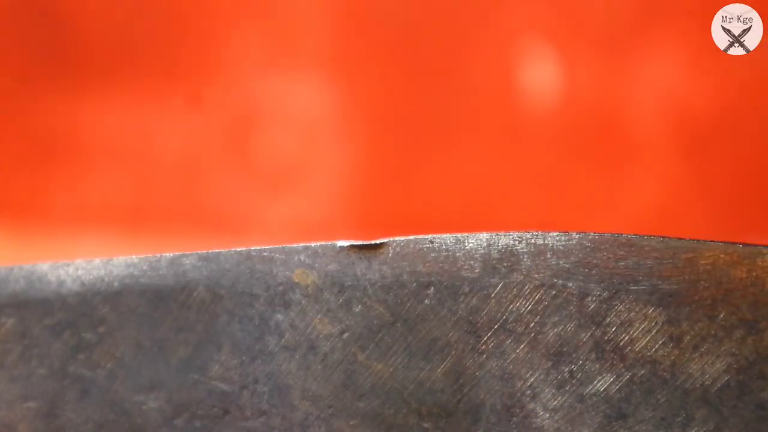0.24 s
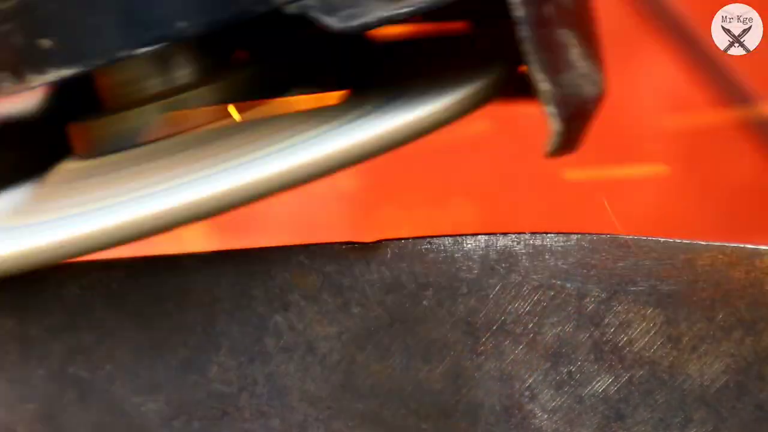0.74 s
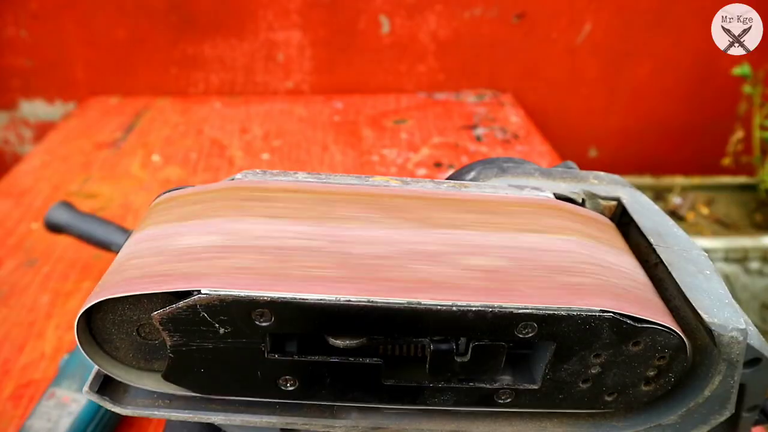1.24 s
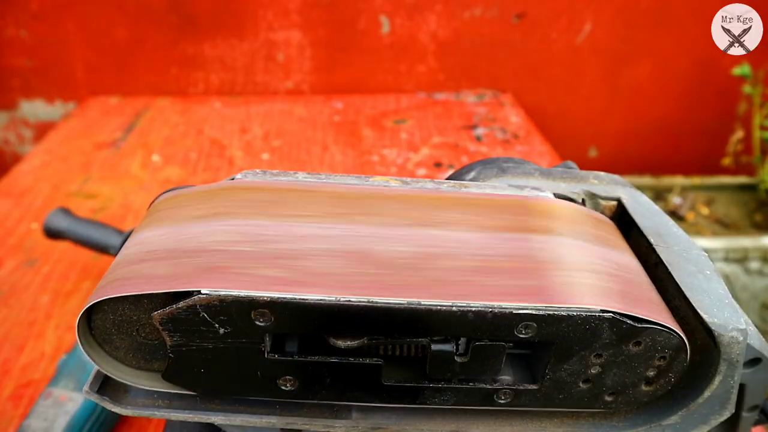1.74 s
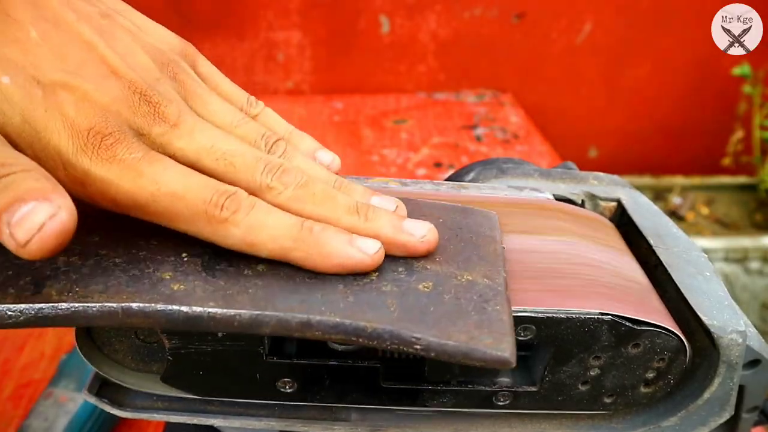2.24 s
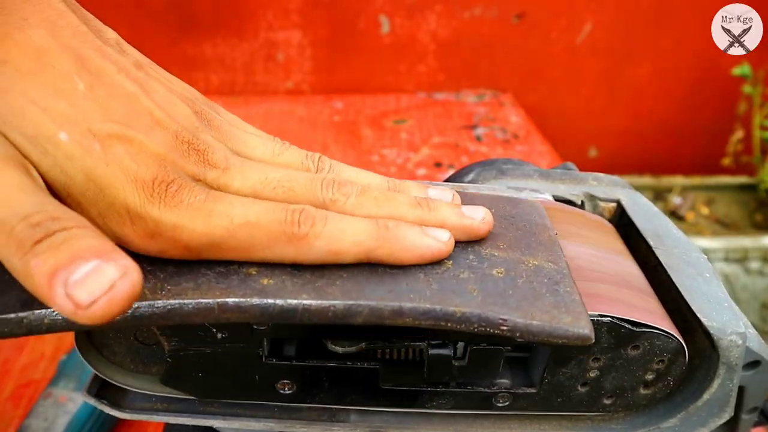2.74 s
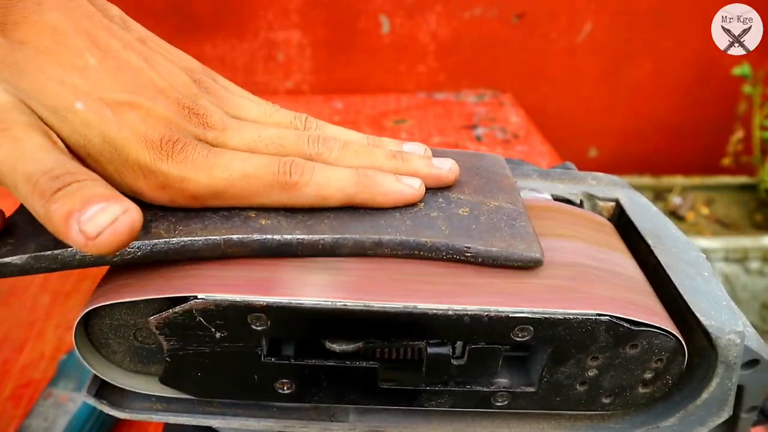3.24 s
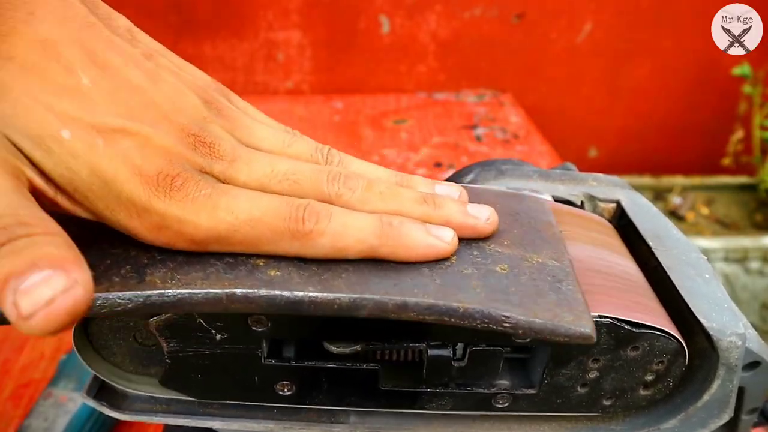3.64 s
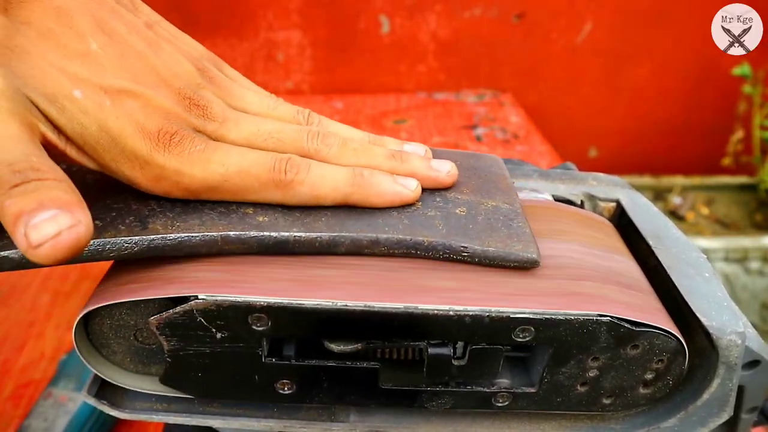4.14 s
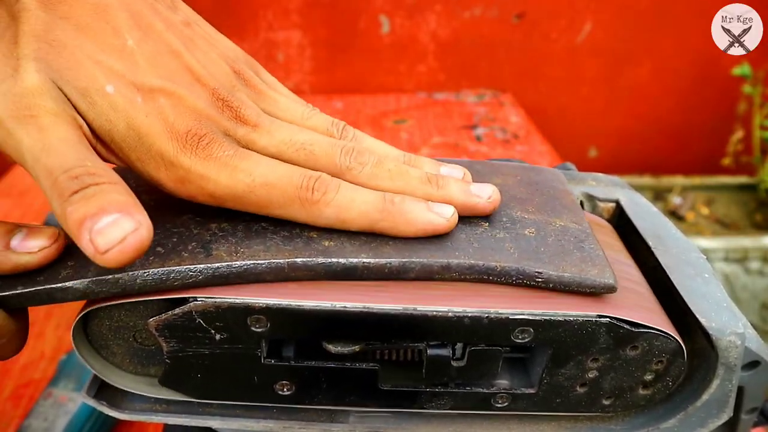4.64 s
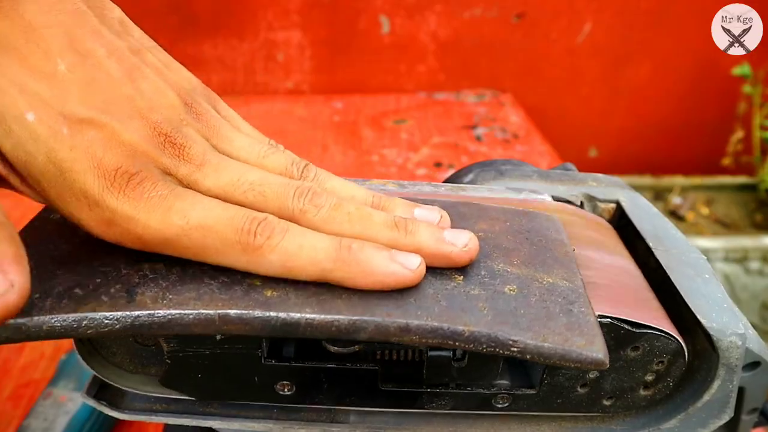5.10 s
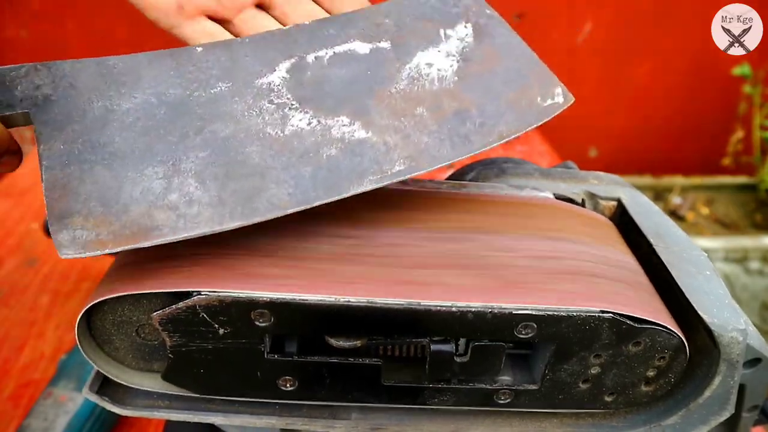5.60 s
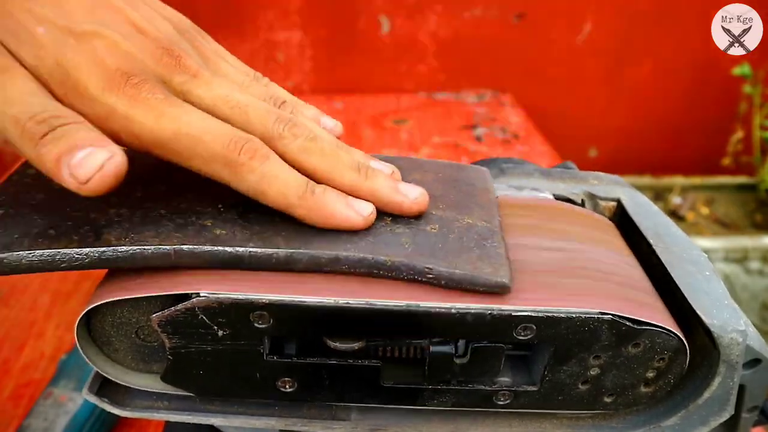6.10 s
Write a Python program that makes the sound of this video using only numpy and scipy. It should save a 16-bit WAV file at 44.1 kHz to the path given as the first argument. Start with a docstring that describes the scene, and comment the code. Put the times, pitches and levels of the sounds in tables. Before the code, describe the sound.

Two rasping angle grinder touches on steel cut to a running belt sander, its whine dipping as a blade scrapes against the belt.

```python
"""In a workshop, an angle grinder bites twice into a steel blade, which rings; its fan rushes between bites.
Then the scene changes: a belt sander is already running belt-up on a bench: its gears whine, its motor hums and
its rollers rattle. The blade is pressed on the belt, so the motor slows and the grit hisses. The blade is
lifted, the motor recovers, and the blade is laid on again."""
import sys
import numpy as np
from scipy import signal
from scipy.fft import rfft, irfft
from scipy.io import wavfile

SR = 44100
rng = np.random.default_rng(int(sys.argv[2]) if len(sys.argv) > 2 else 0)


def master(y):
    """Save y as 16-bit WAV."""
    cut = np.clip(np.atleast_2d(y).T, -1, 1)
    pcm = np.round(cut * 32767)  # scale
    wavfile.write(sys.argv[1], SR, pcm.astype(np.int16))


N = 280476
T, HZ = np.arange(N) / SR, np.fft.rfftfreq(N, 1 / SR)
CUT_S = 1.034  # the grinder gives way to the sander


def amp(db):
    """Turns decibels into a gain."""
    return 10 ** (np.asarray(db) / 20)


def unit(x):
    """Scales a signal to an average strength (rms) of 1."""
    return x / np.sqrt(np.mean(abs(x) ** 2) + 1e-20)


def since(s):
    """Seconds gone since time s, zero before it."""
    return np.maximum(T - s, 0)


def curves(rows):
    """Draws each column of a time table as a curve."""
    s, *columns = np.transpose(rows)
    return [np.interp(T, s, c) for c in columns]


def read(points):
    """Fills in a pitch table at every frequency."""
    hz, value = np.transpose(points)
    return np.interp(np.log(HZ + 1), np.log(hz + 1), value)


def colour(x, spectrum):
    """Shapes x by rows of pitch_hz, level_db, fading beyond both ends; strength 1."""
    below = 1 + (.8 * spectrum[0][0] / (HZ + 1)) ** 6
    above = 1 + (HZ / (1.2 * spectrum[-1][0])) ** 12
    return unit(irfft(rfft(x) * amp(read(spectrum)) / np.sqrt(below * above), N))


def noise():
    """An even hiss (white noise)."""
    return rng.standard_normal(N)


def drift(hz):
    """A random wobble, up to about hz times a second; strength 1."""
    low = HZ[:N // 12]
    a, b = rng.standard_normal((2, len(low)))
    return unit(irfft((a + 1j * b) * np.exp(-.5 * (low / hz) ** 2), N))


def angle(hz):
    """The angle of something turning hz times a second."""
    return 2 * np.pi * (np.cumsum(hz) / SR + rng.random())


def tone(hz, rough, width_hz):
    """A tone roughened by random shaking; strength 1."""
    shake = 1 + rough * (drift(width_hz) + 1j * drift(width_hz))
    return unit((shake * np.exp(1j * angle(hz))).real)


def modes(x, table):
    """Lets x ring an object's natural pitches, called its modes."""
    response = sum((-1) ** k * amp(db) / np.sqrt(width) / (1 + 1j * (HZ - hz) / width) ** 2
                   for k, (hz, width, db) in enumerate(table))
    return irfft(rfft(x) * unit(response), N)


def sag(start, end, rise_s, recover_s):
    """The effect of a push, 0 to 1: builds from start to end, then dies away."""
    return (1 - np.exp(-(since(start) - since(end)) / rise_s)) * np.exp(-since(end) / recover_s)


def stereo(x, side_db, lean_db=0):
    """Left and right differ by a phase step and by echoes off the bench and walls."""
    t = T[:SR // 6]
    echo = unit(rfft(rng.standard_normal(len(t)) * amp(-60 * t / .3), N))
    side = amp(read(side_db)) * unit(2 * echo - 1j)
    balance = amp(lean_db / 2)
    return irfft(rfft(x) * np.array([(1 + side) * balance, (1 - side) / balance]), N)


def grinder_fan():
    """The rush of air swells as the grinder swings off the blade, and fades as it returns."""
    loudness = [(0, -42), (.18, -40), (.22, -36.5), (.33, -32), (.515, -28.5), (.54, -33.5), (.68, -36),
                (.9, -40), (1.0, -43)]  # the swing: time_s, level_db
    air = [(59, -86), (100, -42), (698, -12.5), (877, -6), (1060, -10.5), (1380, -6.5), (2050, -4.5),
           (2320, -6), (3360, -2.5), (5410, -13.5), (6790, -20.5), (12400, -44.5), (14000, -56)]  # rushing air: pitch_hz, level_db
    return amp(curves(loudness)[0] + drift(60)) * colour(noise(), air)


def sander_fan(load, throb):
    """The fan's air pulses with the rollers, and the housing rings along."""
    # air running free and under load: pitch_hz, level_db
    free_air = [(760, -47), (1300, -11.5), (1820, -14), (2050, -13), (2140, -4.5), (2230, -6), (2330, -9.5),
                (2800, -17.5), (3460, -9.5), (3930, -13.5), (4500, -5), (4770, -28), (4890, -19.5),
                (5420, -15), (6000, -36), (7800, -45), (13200, -120)]
    loaded_air = [(760, -22), (1300, -7.5), (1490, -11.5), (1900, -2), (2010, -1.5), (2300, -4),
                  (2400, -10.5), (2610, -8.5), (3640, -7), (3810, -11), (3930, -10.5), (4110, -3.5),
                  (4740, -14.5), (5150, -9.5), (6000, -27), (7800, -61), (13200, -120)]
    housing = [(2673, 47, 7), (3527, 28, 6), (4260, 82, -6), (4840, 18, 0), (5630, 130, -22), (5805, 90, 0),
               (7090, 74, -10), (8740, 36, -14)]  # housing modes: pitch_hz, width_hz, level_db
    free = colour(noise() * amp(1.53 * throb + .2 * drift(400)), free_air)
    loaded = colour(noise() * amp(throb + drift(370)), loaded_air)
    air = amp(-29.5) * np.sqrt(1 - load) * free + amp(-30.5) * np.sqrt(load) * loaded
    return air + amp(-41) * modes(unit(noise() * amp(2.5 * throb)), housing)


def dull_thumps():
    """Short, dull thumps and puffs, like bumps or air on the microphone, with no ring."""
    thumps = [(0.5586, -6.5, 940, 0.00024), (0.56, -19, 890, 0.00074), (1.421, -50, 109, 0.009),
              (2.288, -45, 129, 0.0059), (2.965, -23, 197.9, 0.0019), (3.698, -41, 139, 0.0086),
              (3.962, -22, 210, 0.0018), (4.22, -40, 152.1, 0.0071), (4.699, -43, 130, .005)]  # thumps: time_s, level_db, pitch_hz, length_s
    return sum(amp(db) * np.exp(-abs(T - s) / length) * np.sin(2 * np.pi * hz * (T - s))
               for s, db, hz, length in thumps)


def roller_rattle(load, throb):
    """The rollers clatter unevenly, a little more under load."""
    clatter = [(60, -32.5), (150, -26.5), (300, -16), (450, -12.5), (580, -5.5), (690, -1), (790, 2),
               (900, -5), (1060, -1.5), (1200, -1.5), (1400, -13), (2500, -21.5), (4400, -12), (6000, -38)]  # rattling rollers: pitch_hz, level_db
    gain = amp(-29.5 + .52 * load + .33 * drift(4))
    return gain * colour(noise() * amp(.92 * throb + 2 * np.minimum(drift(500), 1)), clatter)


def roller_clacks(turned, rise_s=.003, detune=.067):
    """The roller knocks the housing once a turn, never twice alike; now and then it knocks hard."""
    hard = [(1.364, -15.5), (3.153, -18), (3.336, -16), (3.4, -20), (3.631, -20), (3.848, -15.5),
            (4.075, -18), (4.861, -16.5), (5.232, -15.5), (5.258, -16), (5.583, -13.5), (5.651, -15)]  # hard knocks: start_s, level_db
    housing = [(760, -5), (1100, -7)]  # modes they ring: pitch_hz, level_db
    turn_times = T[1:][np.diff(turned // (2 * np.pi)) > 0]
    chance = rng.standard_normal((400, 1 + 2 * len(housing)))
    soft = [(s - rise_s, -24 + 3 * min(z, 1)) for s, z in zip(turn_times, chance[:, 0])]
    hz, db = np.transpose(housing)[:, :, None]
    t, out = T[:SR // 30], np.zeros(N)
    shape = (t / rise_s * np.exp(1 - t / rise_s)) ** 2
    for (s, level_db), z in zip(hard + soft, chance[:, 1:]):
        pitch, phase = z.reshape(2, -1, 1)
        ring = (amp(db) * np.sin(2 * np.pi * (hz * (1 + detune * pitch) * t + phase))).sum(0)
        part = out[max(round(s * SR), 0):][:len(t)]
        part += (amp(level_db) * shape * ring)[:len(part)]
    return out


def motor_and_gears(tooth_hz, load, pressed, strained, throb, teeth=9, motor_ratio=1.559):
    """Gear teeth whine and the motor hums; load adds side tones, and a hard push makes them waver."""
    # what the housing lets through at each speed: tooth_hz, third_harmonic_db, motor_hum_db
    voicing = [(1958, -43, -41.5), (1990, -47.5, -39), (2020, -54, -39.5), (2026, -46.5, -41),
               (2090, -63, -47), (2130, -60, -37.5), (2138, -60, -43.5), (2208, -64, -35.5),
               (2228, -70, -38.5)]
    gear_levels = [(1.05, -39, -46), (1.15, -29.5, -40), (2.05, -31.5, -43), (2.17, -26.5, -33),
                   (2.3, -34.5, -35.5), (2.4, -41, -31), (2.48, -27, -30.5), (2.7, -27.5, -30.5),
                   (2.9, -29.5, -30.5), (3.36, -41, -31), (3.5, -32.5, -32.5), (4.18, -34.5, -31.5),
                   (4.25, -42, -43), (4.35, -38.5, -44), (4.72, -43, -46), (4.84, -39, -37.5),
                   (5.13, -35, -39), (5.19, -45, -40), (5.225, -29.5, -46), (5.37, -27.5, -39),
                   (5.69, -29.5, -43), (6.05, -27.5, -41), (6.35, -33, -35)]  # gear whine: time_s, tooth_db, octave_db
    # tones of the gear shaft and of the motor's twelve-blade fan: speed_multiple, free_db, loaded_db
    shaft_tones = [(3, -53, -60), (8, -46.5, -45), (10, -53, -36), (11, -57, -47), (12, -45, -48),
                   (15, -74, -54), (17, -52, -47), (19, -63, -47), (20, -63, -48)]
    fan_tones = [(11.99, -38, -52), (24.1, -67, -80)]
    speeds, *columns = np.transpose(voicing)
    third_db, motor_db = (np.interp(tooth_hz, speeds, c) for c in columns)
    tooth_db, octave_db = curves(gear_levels)
    shaft_hz = tooth_hz / teeth * (1 + (.00052 + .0005 * load + .002 * strained) * drift(14.2))
    motor_hz = shaft_hz * motor_ratio
    level = lambda free_db, loaded_db, share: amp(free_db + (loaded_db - free_db) * share)
    whine = amp(tooth_db + 2 * strained * drift(12)) * tone(teeth * shaft_hz, .063, 54)
    octave_gain = amp(octave_db + 2.5 * strained * drift(12))
    whine += octave_gain * tone(2 * teeth * shaft_hz, .2 + .25 * strained, 70)
    whine += amp(third_db) * tone(3 * teeth * shaft_hz, rough=.81, width_hz=45)
    side_gain = amp(.18 * load * (octave_db + 33.5))  # hard-meshing teeth raise the side tones
    for k, free, loaded in shaft_tones:
        whine += side_gain * level(free, loaded, load) * tone(k * shaft_hz, .23, 10)
    for k, free, loaded in fan_tones:  # the whistle fades as the blade is pressed down
        whine += level(free, loaded, np.maximum(load ** 2, pressed)) * tone(k * motor_hz, .14, 24)
    imbalance = level(-40, -55, load ** 7) * tone(shaft_hz * (1 + .018 * drift(10.5)), .34, 23.4)
    hum = amp(motor_db) * tone(motor_hz * (1 + .012 * drift(10.4)), .24, 32)
    return whine * unit(amp(throb)) + imbalance + hum


def belt_hiss(throb):
    """The belt's grit hisses, pulsing with the rollers."""
    grit = [(3060, -50), (5200, -3), (6070, -6), (6460, -8), (7580, -14.5), (9010, -18), (11900, -31.5),
            (15000, -50)]  # rubbing grit: pitch_hz, level_db
    return colour(noise() * amp(throb + .93 * drift(900) + .68 * drift(11)), grit)


def belt_scrape(throb):
    """The steel scrapes on the belt under a hard push."""
    steel = [(2400, -8), (2850, -4), (3250, -2.5), (3800, -23)]  # scraping steel: pitch_hz, level_db
    return colour(noise() * amp(1.3 * throb + 2 * drift(26)), steel)


def grain_snags(throb, spread_db=4.5):
    """Single grains snag on the steel, mostly when the roller lifts the belt."""
    tick = [(1500, -6), (2800, -1.5), (4200, 0), (5500, -6), (8000, -22)]  # one snag: pitch_hz, level_db
    snags = (rng.random(N) < 900 / SR * amp(3 * throb)) * np.sign(noise())
    return colour(snags * amp(spread_db * np.minimum(rng.exponential(1, N), 3)), tick)


def disc_rim(turns_hz, flare_db=5.5, flare_s=.035, count=110):
    """The same grit comes round every turn: a buzz whose overtones flare as the contact shifts."""
    t = T[T < CUT_S]
    turned = angle(turns_hz)[:len(t)]
    times = np.arange(0, CUT_S + flare_s, flare_s)
    flares = amp(flare_db * np.clip(rng.standard_normal((count, len(times))), -2, 2))
    phases = 2 * np.pi * rng.random(count)
    buzz = sum(np.interp(t, times, flares[k]) * np.cos((k + 1) * turned + phases[k])
               for k in range(count))
    return np.pad(unit(buzz), (0, N - len(t)), mode="wrap")


def blade_ring(scrape, flare_db=4, bend=.00303):
    """Scraping rings the blade; the disc's shifting pressure bends the pitch."""
    blade = [(1217, 30, -19), (1750, 45, -15), (2250, 45, -10), (2775, 25, -8), (2950, 40, -12),
             (3270, 45, -14), (3600, 80, -11), (4128, 40, -6), (4640, 60, -11), (4830, 45, -9),
             (4985, 32, -6), (5400, 60, -15), (6100, 80, -13), (6356, 25, -9), (6750, 55, -13),
             (7050, 80, -16), (8135, 30, -21), (9300, 80, -29), (10010, 35, -21), (11380, 35, -30),
             (12300, 40, -29)]  # blade modes: pitch_hz, width_hz, level_db
    push = unit(scrape + .7 * noise())
    ring = sum(amp(db + flare_db * np.clip(drift(14), -2, 2)) * modes(push, [(hz, width, 0)])
               for hz, width, db in blade)
    return unit(np.interp(T + np.cumsum(bend * drift(14.7)) / SR, T, ring))


def disc_squeals(turns_hz):
    """Brief tones, roughened by grit: whines follow the disc's speed, squeals stay near a steel mode."""
    whines = [(.045, .13, 17, -33), (.055, .09, 21, -38), (.05, .1, 27, -40), (.05, .09, 60, -36.5),
              (.08, .13, 15, -40), (.113, .05, 22, -33.5), (.115, .05, 21, -39), (.118, .06, 16, -35),
              (.61, .11, 15, -32.5), (.585, .07, 23, -38), (.585, .06, 47, -42), (.66, .06, 16, -39),
              (.725, .06, 21, -35.5), (.785, .08, 22, -38.5)]  # disc whines: peak_s, length_s, speed_multiple, level_db
    squeals = [(.03, .07, 6830, -40), (.04, .08, 5350, -42), (.04, .06, 3600, -40), (.11, .08, 6350, -40),
               (.515, .03, 3620, -34), (.6, .06, 4850, -40), (.632, .05, 4130, -32), (.657, .05, 3620, -35),
               (.695, .04, 6750, -40), (.705, .05, 4770, -38), (.712, .06, 2755, -36.5),
               (.745, .08, 4135, -36), (.77, .05, 6760, -42), (.86, .05, 4180, -34.5),
               (.862, .04, 4780, -37), (.868, .04, 4975, -34), (.885, .04, 8135, -46),
               (.928, .04, 2990, -34), (.935, .05, 4870, -36), (.93, .04, 6790, -42),
               (.955, .06, 6356, -36)]  # steel squeals: peak_s, length_s, pitch_hz, level_db
    t, out = T[T < CUT_S], np.zeros(N)
    tones = [(s, length, k * turns_hz[:len(t)], db, .25) for s, length, k, db in whines]
    tones += [(s, length, hz * (1 - .01 * (t - s)), db, .6) for s, length, hz, db in squeals]
    grit = drift(90) + 1j * drift(90)
    for s, length, hz, db, rough in tones:
        shake = 1 + rough * grit[rng.integers(N - len(t)):][:len(t)]
        swell = amp(db) * np.exp(-(2 * (t - s) / length) ** 2)
        out[:len(t)] += swell * unit((shake * np.exp(1j * angle(hz))).real)
    return out


def bite(start, end, db, attack_s=.0046, release_db_per_s=347):
    """The loudness of one touch of the disc: it snaps on and lets go quickly."""
    return np.minimum(since(start) / attack_s, 1) * amp(db - release_db_per_s * since(end))


def grinder():
    """The disc strikes twice a turn; each bite rasps, shakes the clamp and rings the blade."""
    speed = [(0, 106), (.07, 102.9), (.125, 104.4), (.55, 123), (.61, 119.6), (.64, 117), (.7, 110.1),
             (.79, 101.1), (.91, 95.8)]  # the disc slows in each bite: time_s, turns_per_s
    bites = [(-.06, 0.12, -30, -57, -43), (0.553, 0.914, -33, -38, -34.5)]  # bites, before the shaping below: start_s, end_s, rasp_db, clamp_db, ring_db
    # the rasp of each bite and the clamp's chatter: pitch_hz, level_db
    first_rasp = [(300, -30), (1150, -15), (1650, -4), (2200, -3), (2500, -5), (3000, -7), (3600, 0.5),
                  (4350, -10), (5300, -6), (5600, -10), (6200, -7.5), (7100, -10), (7800, -25), (9600, -25),
                  (14000, -40)]
    second_rasp = [(600, -36), (1800, 3), (2500, -2), (3300, -18), (4400, -2), (4780, 4), (5450, -3),
                   (6100, 0), (7000, -5), (7700, -10), (10000, -16), (11000, -35), (14000, -26)]
    clamp = [(100, -24), (200, -3.5), (420, 4.5), (600, -2.5), (900, 1.5), (1400, -3), (2500, -8)]
    turns_hz = curves(speed)[0] * (1 + .0013 * drift(60))
    contact = amp(2 * np.cos(angle(2 * turns_hz)) + 1.6 * drift(140))
    scrape = unit(contact * (disc_rim(turns_hz) + .3 * noise()))
    ring = blade_ring(scrape)
    chatter = colour(contact * noise() * amp(1.5 * drift(400)), clamp)
    out = grinder_fan()
    for (start, end, rasp_db, clamp_db, ring_db), rasp in zip(bites, (first_rasp, second_rasp)):
        easing_db = 6 * since(start)  # the hand eases off
        out += bite(start, end, rasp_db - 2.5 - easing_db) * colour(scrape, rasp)
        landing_db = 6 * np.exp(-(since(start) / .098) ** 4)  # the clamp shakes hardest at first
        out += bite(start, end, clamp_db + landing_db - 1200 * since(end)) * chatter
        swell_db = 2 * np.exp(-((T - end) / .11) ** 2)  # the steel rings up as the disc lets go
        damping_db = 50 * since(end)  # the clamp quiets the freed blade
        ring_end = end + .16 * (end - start)
        out += bite(start, ring_end, ring_db - .5 + swell_db - damping_db) * ring
    return out + disc_squeals(turns_hz)


def sander(free_hz=2213, loaded_hz=2048, touch_s=.022, seat_s=.48):
    """Two rollers shake the housing once a turn; the pressed blade slows the motor and rubs the grit."""
    # pushes of the blade, which add up: start_s, end_s, full_slowing_hz, hiss_db, scrape_db
    presses = [(2.14, 5.19, 213, -45, -57.5), (4.2, 4.36, 164.9, -44, -36.5), (4.36, 4.53, 100, -46, -36),
               (4.55, 5.16, 42.03, -50, -37.5), (6.102, 6.5, 194.3, -39.5, -60)]
    # the blade catches or slips, changing levels: time_s, length_s, rattle_db, whine_db, rasp_db, hiss_db
    catches = [(2.192, 0.025, -0.5, 1.5, 0.5, 7), (2.335, .012, -6, -2, 0, 5), (2.385, .02, -2, -3, 0.5, 4),
               (2.495, 0.0079, 3.5, 1, 1, 3), (2.538, 0.021, -2.5, -4.5, -0.5, -2),
               (2.64, .03, -0.5, 0.5, -1.5, -3), (3.03, .012, 1.5, -0.5, 0.5, 3),
               (3.215, .012, -1, 1, 1, 3), (3.28, 0.014, 0, 1, 3, 2), (3.32, 0.015, -0.5, -0.5, -1, -2),
               (3.38, .016, 1, 0, 3, 1), (3.598, 0.011, -1, 1, 1, 3), (3.708, .012, 3.5, 0, 2.5, -2),
               (4.01, .01, 0, 0, 1, 2), (4.098, 0.03, -1, -2.5, 2.5, 2.5), (4.27, .012, 1.5, 0, 0, -2),
               (4.337, 0.023, 1.5, 3, 1.5, 1), (4.482, 0.015, 6.5, -2, -1, 1),
               (4.545, 0.029, 1.5, 0.5, 1.5, 2.5), (4.657, 0.0071, 0, -4, 2, 2),
               (4.78, 0.0069, -3, 1, 3, 2), (4.958, .004, 8, -1, 4, 4), (5.049, 0.0069, 1.5, 0, 4.5, -1),
               (5.085, 0.0077, 0, -1, 3.5, 1), (5.135, .015, 0.5, -3, 0.5, -1), (5.18, .01, -1, 2, 2, 3.5),
               (6.235, 0.022, 0.5, -2, 3.5, -2)]
    tooth_hz = 2206.7 + 3 * T  # gear teeth meeting per second, creeping up as the machine warms
    hiss_power, scrape_power, pressed = amp(-46) ** 2, 0, 0  # even the bare belt hisses
    for start, end, slowing_hz, hiss_db, scrape_db in presses:
        tooth_hz -= slowing_hz * sag(start, end, rise_s=.425, recover_s=.11)
        hiss_power += amp(hiss_db) ** 2 * sag(start, end, seat_s, touch_s)
        scrape_power += amp(scrape_db) ** 2 * sag(start, end, touch_s, touch_s)
        pressed = np.minimum(pressed + sag(start, end, .17, touch_s), 1)
    strained = np.sqrt(scrape_power / scrape_power.max())
    load = np.clip((free_hz - tooth_hz) / (free_hz - loaded_hz), 0, 1)
    roller_hz = np.interp(load, [0, 1], [38.57, 31])
    turned = angle(roller_hz * (1 + .04 * drift(7.13)))
    second_roller = np.cos(angle(46.77 * tooth_hz / free_hz * (1 + .038 * drift(3.4))))
    throb = np.minimum(np.cos(turned) + .68 * second_roller + .5 * drift(42), 2)
    rattle_db, whine_db, rasp_db, grit_db = sum(np.outer(dbs, np.exp(-((T - s) / length) ** 2))
                                                for s, length, *dbs in catches)
    rattle = amp(rattle_db) * roller_rattle(load, throb)
    air = amp(rasp_db) * sander_fan(load, throb)
    hiss = amp(grit_db) * np.sqrt(hiss_power) * belt_hiss(throb)
    scrape = amp(rasp_db) * np.sqrt(scrape_power) * belt_scrape(throb)
    snags = amp(rasp_db - 41.5) * (.5 * pressed + strained) * grain_snags(throb)
    pressure = amp(pressed * drift(9))  # the hand pushes unevenly
    clacks = roller_clacks(turned)
    whine = amp(whine_db) * motor_and_gears(tooth_hz, load, pressed, strained, throb)
    return air + rattle + clacks + whine + pressure * (hiss + scrape + snags)


def scene():
    """The grinding breaks off abruptly; after a blink of silence the scene changes to the sander, already
    running."""
    # stereo width of each tool: pitch_hz, side_db
    grinder_width = [(100, -36), (1000, -37), (3700, -9), (6000, -6), (8000, 2), (10000, 1), (14000, 12)]
    sander_width = [(60, -11), (150, -14), (300, -31.5), (600, -24.5), (1200, -18.5), (2300, -12.5),
                    (4500, -10), (7000, -5), (14000, -7.5)]
    sander_lean = [(250, 0), (500, -1), (900, 3), (1700, 2.5), (2400, 0), (3700, -1.5), (7000, -0.5)]  # the sander's balance: pitch_hz, left_minus_right_db
    before = np.clip((CUT_S - .004 - T) / .002, 0, 1)
    after = np.clip((T - CUT_S - .001) / .011, 0, 1)
    thumps = dull_thumps()
    grinding = stereo(before * (grinder() + thumps), grinder_width)
    return grinding + stereo(after * (sander() + thumps), sander_width, read(sander_lean))


def record(dry, low_cut_hz=45, high_cut_hz=15150):
    """Takes away the deepest rumble and the highest treble."""
    trimmed = signal.sosfilt(signal.butter(2, low_cut_hz, "highpass", fs=SR, output="sos"), dry)
    treble_cut = signal.firwin(511, high_cut_hz, window=("kaiser", 9), fs=SR)
    return signal.oaconvolve(trimmed, treble_cut[None], "same")


dry = scene()
out = record(dry)
master(out)
```